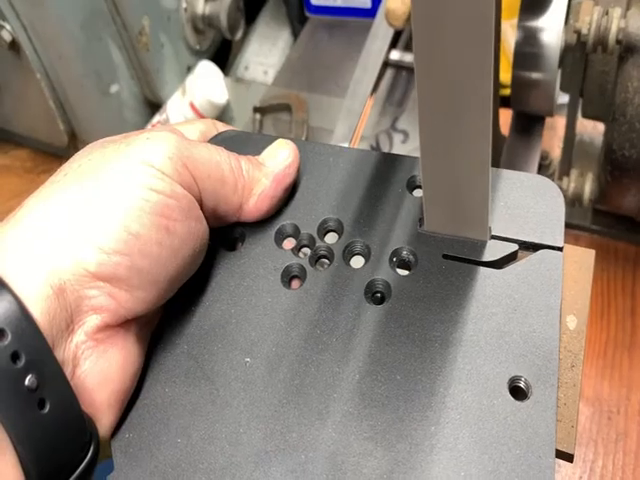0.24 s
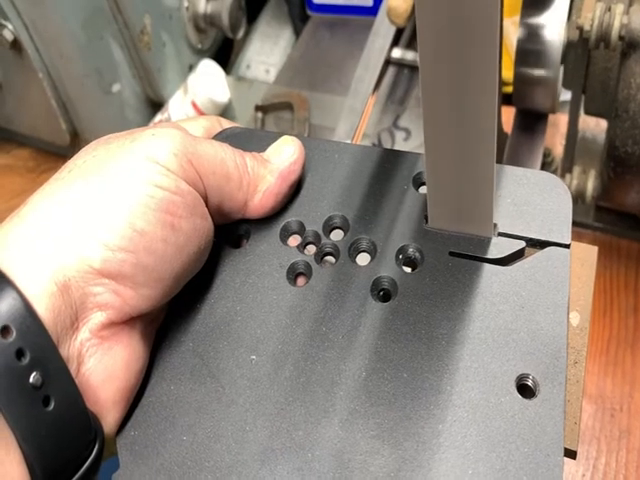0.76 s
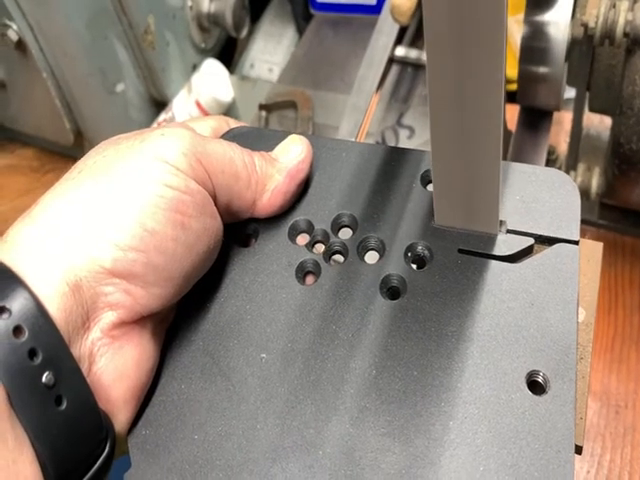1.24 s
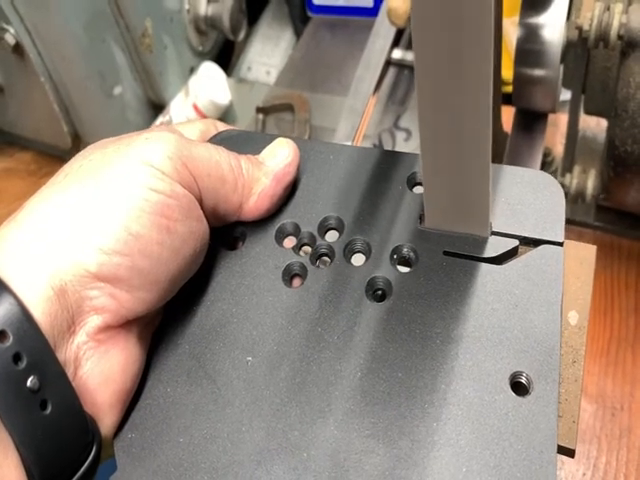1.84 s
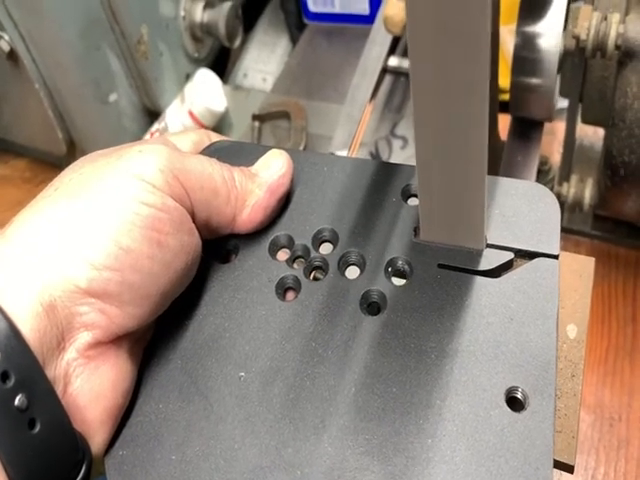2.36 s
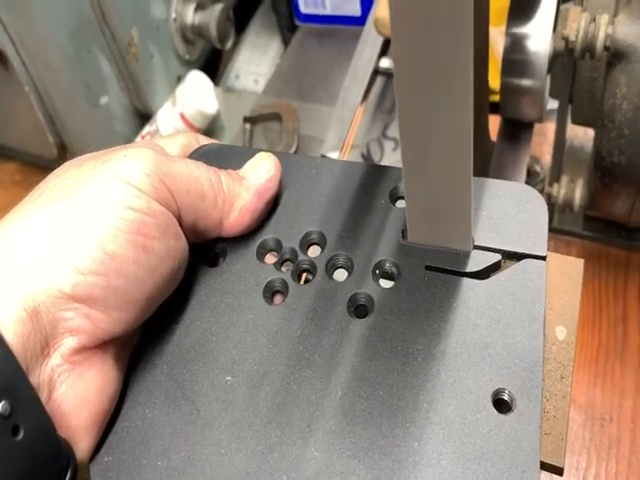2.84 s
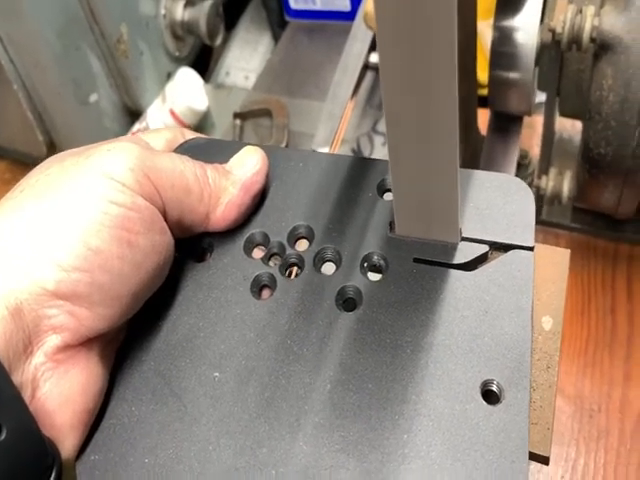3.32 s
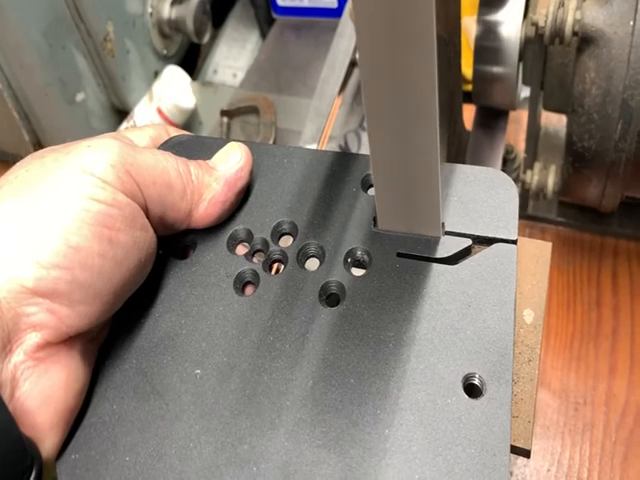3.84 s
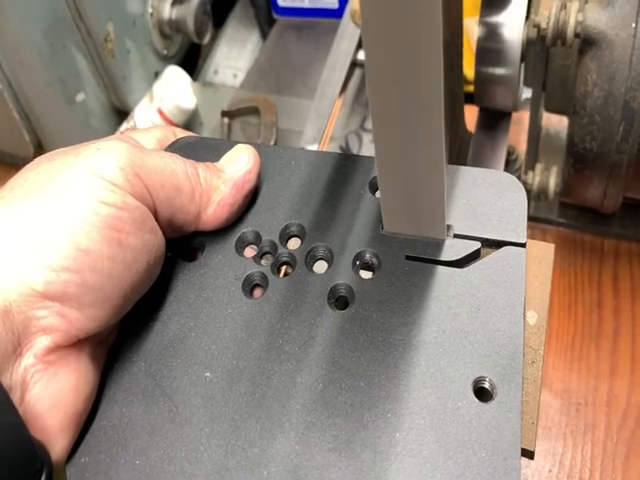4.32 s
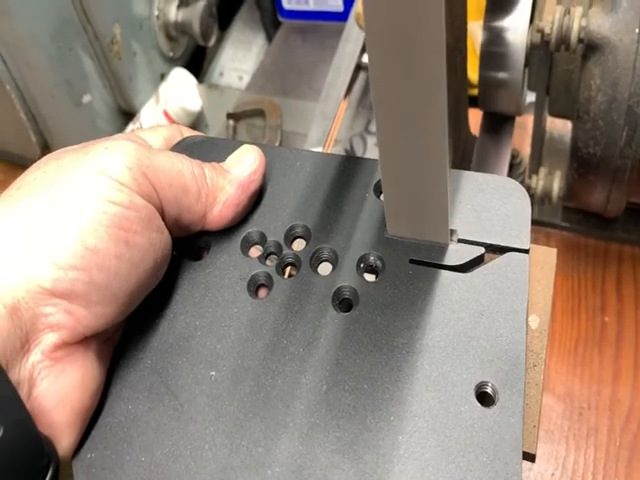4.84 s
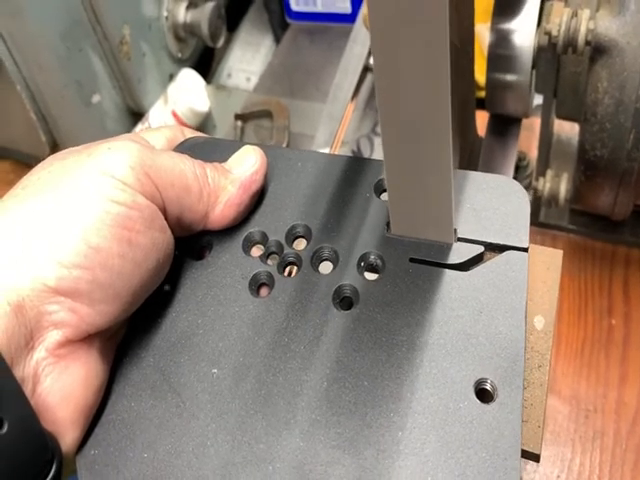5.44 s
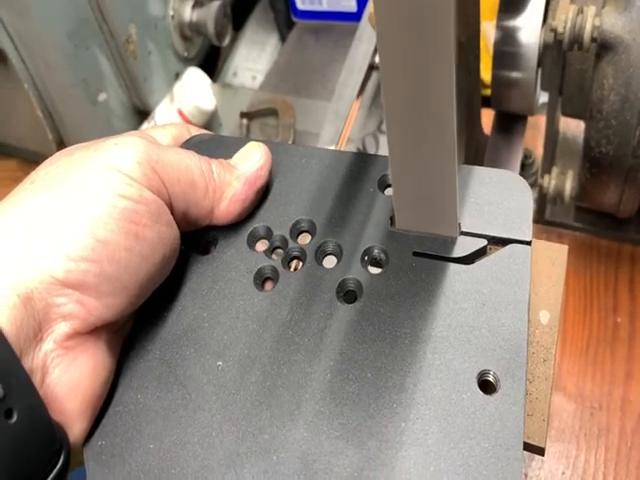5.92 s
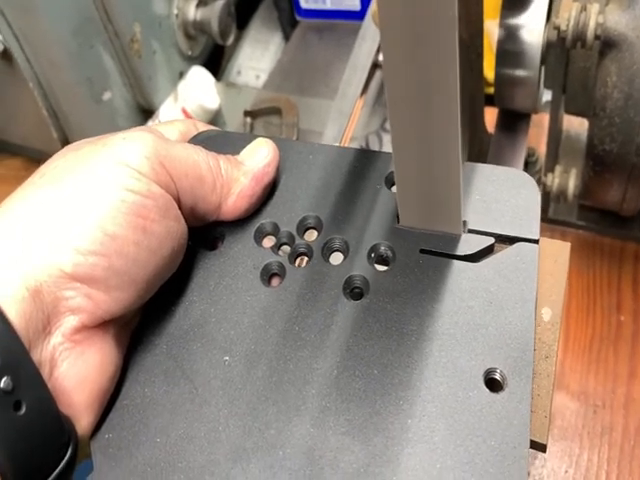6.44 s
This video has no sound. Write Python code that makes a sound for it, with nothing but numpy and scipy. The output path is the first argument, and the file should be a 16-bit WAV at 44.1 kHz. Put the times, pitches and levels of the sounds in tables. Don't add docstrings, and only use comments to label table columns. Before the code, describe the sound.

A small band saw idles in a workshop, its blade rasping and ticking through a metal plate's slot over a steady electric motor hum.

```python
import sys
import numpy as np
from scipy import signal
from scipy.fft import rfft, irfft, dct, next_fast_len
from scipy.io import wavfile
from scipy.ndimage import uniform_filter1d

SR = 44100
rng = np.random.default_rng(int(sys.argv[2]) if len(sys.argv) > 2 else 0)


def wrap_up_sound(samples):
    columns = np.atleast_2d(samples).T
    tamed = np.clip(columns, -1, 1)
    steps = np.round(tamed * 32767).astype(np.int16)
    wavfile.write(sys.argv[1], SR, steps)


def invert_db(level):
    return 10 ** (np.asarray(level, dtype=float) / 20)


N = 294147

MAINS_HZ, SHAFT_HZ, WHEEL_HZ = 120.0, 29.72, 6.553
T = np.arange(N) / SR
SIZE = next_fast_len(N + 8192)
HZ = np.fft.rfftfreq(SIZE, 1 / SR)


def evened(x):
    return x / np.sqrt(np.mean(x ** 2) + 1e-20)


def read(points, column=1):
    p = np.array(points)
    return np.interp(np.log(HZ + 1), np.log(p[:, 0] + 1), p[:, column])


def drift(rate_hz):
    noise = rfft(rng.standard_normal(SIZE))
    return evened(irfft(noise / (1 + (HZ / rate_hz) ** 2), SIZE)[:N])


def above(hz, width):
    return .5 + .5 * np.tanh((HZ - hz) / width)


def body(spectrum, modes, ref_db):
    rings = sum((invert_db(2 * db) - 1) / (1 + (2 * (HZ - hz) / width) ** 2) for hz, width, db in modes)
    gain = invert_db(read(spectrum) + ref_db) * np.sqrt(SR / 2 * np.maximum(1 + rings, .01))
    log_gain = np.log(gain)
    whole = signal.hilbert(np.r_[log_gain, log_gain[-2 + SIZE % 2:0:-1]])
    return np.exp(np.conj(whole[:len(HZ)]))


# time in seconds, pressure of its flank in dB, bite of its teeth in dB.
BEARING = [(0, .6, -.8), (.35, -.5, -.7), (.75, -1.2, 0), (1, -1.6, 1.2), (1.2, -3.4, -.7), (1.5, -1.2, 0),
           (1.85, 1.0, -.3), (2.4, 1.1, -.2), (3.1, 1.4, .2), (3.5, 1.6, -.6), (3.85, 1.5, .6),
           (4.15, -1.1, .2), (4.5, -.6, 1.4), (5, -1.2, .6), (5.35, .1, -.5), (5.7, 1.4, -.5),
           (6.15, .9, 0), (6.66, .4, 2.6)]


def swelling(spectra, follows, edges):
    s, pressure_db, bite_db = np.transpose(BEARING)
    steps = [1] + [above(hz, 260) for hz in edges] + [0]
    out = 0
    for k, (per_pressure, per_bite, creep) in enumerate(follows):
        level_db = per_pressure * pressure_db + per_bite * bite_db + creep * (s - s.mean())
        band = irfft(spectra * (steps[k] - steps[k + 1]), SIZE)[:, :N]
        out = out + invert_db(np.interp(T, s, level_db)) * band
    return out


# frequency in Hz, level in dB per Hz.
RASP_COLOUR = [(5000, -14.5), (5600, -9), (6400, -4.2), (6720, -6.9), (7350, -6.3), (7780, 1.8),
               (8150, -2.6), (8550, 2.6), (8900, -2.1), (11500, -1.6), (13000, -5.2), (13850, -1.2),
               (14000, -7.9), (15700, -2.5)]
# frequency in Hz, width in Hz, height over the noise in dB.
BLADE_RINGS = [(6390, 50, 5), (7070, 25, 11.5), (9520, 120, 2), (10105, 35, 6), (12210, 80, 2),
               (15700, 80, 2)]
# dB per dB of pressure, dB per dB of bite, creep in dB per second.
RASP_SWELL = [
    (1.25, 0, .15),
    (.63, .38, -.19),
    (0, 1.1, 0),
]


def blade(rub):
    near, scattered = rng.standard_normal((2, N)) * np.sqrt(rub)
    t = np.arange(200) / SR
    for s, db in catches():
        hz = rng.uniform(8400, 11200)
        tick = np.exp(-t / .00019) * np.cos(2 * np.pi * hz * t)
        near[round(s * SR):][:200] += invert_db(1.4 * db + 28) * tick
    same, lead_s = .985, 1 / 4680
    left = rfft(near, SIZE)
    turn = 2 * np.pi * HZ * lead_s + 0.11 + 0.17 * (1 - above(8700, 300))
    right = same * left * np.exp(1j * turn) + np.sqrt(1 - same ** 2) * rfft(scattered, SIZE)
    colour = body(RASP_COLOUR, BLADE_RINGS, ref_db=-65.5) * above(5692, 370)
    return swelling(colour * np.array([left, right]), RASP_SWELL, (7500, 11000))


# time
# in seconds, peak in dB.
STRAY_TICKS = [(0.2535, -12.8), (0.4275, -8), (0.7376, -12.8), (1.1782, -13.2), (1.2723, -12.9),
               (1.4448, -10.1), (1.576, -6), (1.5871, -10), (1.7197, -11.2), (1.9298, -10.4),
               (2.7537, -12.2), (3.3718, -11.6), (4.2903, -9.5), (4.6215, -11.6), (5.7554, -9),
               (5.9067, -10.8), (6.3295, -9.7), (6.4222, -11.2), (6.6307, -10.4),
               (0.0288, -15.5), (0.3456, -14.4), (0.3657, -13.5), (0.4869, -14.1), (0.9804, -12.4),
               (1.2377, -15.5), (1.3291, -14.3), (1.3904, -14.8), (1.4735, -13.7), (1.5461, -12.7),
               (1.7457, -12.8), (1.8462, -12.3), (2.1068, -13.0), (2.1226, -13.5), (2.5644, -11.9),
               (2.6037, -12.6), (2.7293, -13.1), (3.3866, -11.6), (3.4698, -13.6), (3.645, -12.8),
               (3.7032, -13.0), (3.764, -13.1), (3.8319, -11.3), (4.3446, -12.7), (4.4626, -12.5),
               (4.6803, -13.3), (5.0535, -11.7), (5.145, -14.1), (5.2201, -14.0), (5.2893, -14.8),
               (5.3538, -14.2), (5.8376, -13.5), (5.9642, -14.1), (6.0134, -13.8), (6.0199, -13.7),
               (6.0878, -14.0), (6.4273, -12.4), (6.4555, -12.8)]
# place as a share of a turn, first second, last second, peak in dB.
WHEEL_BURRS = [(.078, 1.6, 3.5, -15), (.078, 5.0, 6.6, -15), (.095, 1.8, 3.5, -14), (.115, 3.8, 5.3, -13),
               (.193, 1.8, 3.6, -13.5), (.248, 1.9, 3.5, -14), (.328, 1.2, 2.8, -15), (.4, 2.4, 4.2, -14),
               (.4, 5.2, 6.1, -14.5), (.445, 3.7, 6.6, -14.5), (.468, .8, 2.1, -13), (.468, 3.9, 5.2, -14),
               (.638, .1, 6.6, -16), (.665, .1, 6.0, -16), (.805, 1.9, 3.4, -12)]


def catches():
    turns = np.arange(int(N / SR * WHEEL_HZ))
    jolts = []
    for share, first, last, db in WHEEL_BURRS:
        for s in (turns + share) / WHEEL_HZ:
            if first < s < last:
                jolts.append((s, db + 1.3 * rng.standard_normal()))
    return STRAY_TICKS + jolts


WHEEL_WOBBLE = [(1, 0.043, 0.21), (2, 0.099, 0.41), (3, 0.14, 0.32), (4, 0.033, 0.9), (5, 0.044, 0.36),
                (6, 0.084, 0.74)]
# rate in Hz, depth as a share of power, first peak as a share of a cycle.
QUICK_THROBS = [(29.74, .12, .04), (85.19, .09, .46), (98.3, .09, .94), (120, .17, .56), (144.1, .06, .28),
                (170.33, .08, .37), (196.52, .07, .89), (203.05, .06, .11)]


def turning():
    slow = sum(d * np.cos(2 * np.pi * (order * WHEEL_HZ * T - at)) for order, d, at in WHEEL_WOBBLE)
    quick = sum(d * np.cos(2 * np.pi * (hz * T - at)) for hz, d, at in QUICK_THROBS)
    return np.maximum(1 + slow, .1) * np.maximum(1 + quick, .1)


def grit(per_s, spread_db, fade_s, share):
    sizes = invert_db(spread_db * np.minimum(rng.exponential(1, N), 4)) * (rng.random(N) < per_s / SR)
    bursts = signal.lfilter([1], [1, -np.exp(-1 / (fade_s * SR))], sizes)
    return 1 - share + share * bursts / bursts.mean()


# frequency in Hz, level in dB per Hz.
FRAME_COLOUR = [(40, -10), (60, -15.5), (100, -12), (200, -10), (320, -8.5), (480, -8), (700, -11),
                (1200, -13), (1800, -13.5), (2400, -9), (2700, -6.5), (3600, -7), (4000, -13.5),
                (5100, -13)]
# frequency in Hz, width in Hz, height
# over the noise in dB.
FRAME_RINGS = [(96, 12, 7), (390, 20, 5), (475, 150, -9), (570, 25, 7), (685, 60, -12), (600, 14, 9),
               (628, 15, 7), (830, 110, 6), (912, 20, 8), (1012, 12, 11), (1130, 90, -3), (1640, 40, 4),
               (2026, 25, 4), (2270, 40, 3), (2586, 18, 11), (3366, 14, 11), (3497, 25, 12),
               (2800, 120, 1.5), (3130, 150, 1.5), (4160, 120, 3), (4510, 70, 5.5), (4840, 45, 5),
               (5320, 120, 6), (5540, 220, 4)]
# dB per dB of pressure, dB per dB of bite, creep in dB per second.
FRAME_SWELL = [
    (.08, 0.57, 0.15),
    (0.511, 0.87, -0.25),
    (.42, .3, -.2),
]
# frequency in Hz, likeness in step,
# likeness a quarter cycle apart, left minus right in dB.
PORT_LIKENESS = [(40, .88, 0, -.3), (150, .98, -.1, -.8), (430, .84, -.4, -1.2), (650, .9, -.1, .3),
                 (860, .76, -.45, .8), (1030, .65, -.65, 1.2), (1200, -.2, -.4, 4.5), (1340, -.1, .45, 3),
                 (1620, .05, -.25, 0), (1860, 0, .65, -.2), (2100, .55, .2, -.6), (2250, .2, .2, -.9),
                 (2400, .55, -.05, -.9), (2780, -.65, -.1, -.7), (2980, -.9, 0, -.6),
                 (3340, 0.0, -.35, 1.0), (3520, -0.85, 0.1, 1.8), (3900, 0.8, -0.08, -0.4),
                 (4050, .65, 0, -.6), (4200, -0.45, -0.05, -0.9), (4480, 0.4, -0.15, -0.1),
                 (4700, -.1, -0.2, -0.3), (5050, .25, .1, .8), (5210, 0.85, 0, 1.5),
                 (5500, -0.62, 0.3, 2.0)]


def frame(rub):
    knock = 1 + 1.2 * (.5 + .5 * np.cos(2 * np.pi * (SHAFT_HZ * T - .3))) ** 4
    low = rng.standard_normal((2, N)) * np.sqrt(knock * grit(90, 6, .004, .25))
    high = rng.standard_normal((2, N)) * rub ** 0.26 * knock ** 0.22
    rumble = rng.standard_normal((2, N))
    shaking = rfft(rumble, SIZE) * (1 - above(566, 89))
    shaking = shaking + rfft(low, SIZE) * (above(603, 112) - above(2000, 340))
    a, b = shaking + rfft(high, SIZE) * above(1380, 360)
    same = read(PORT_LIKENESS, column=1) + 1j * read(PORT_LIKENESS, column=2)
    same = same / np.maximum(abs(same) / .985, 1)
    tilt = invert_db(read(PORT_LIKENESS, column=3) / 2)
    other = same * a + np.sqrt(1 - abs(same) ** 2) * b
    pair = np.array([a * tilt, other / tilt])
    colour = body(FRAME_COLOUR, FRAME_RINGS, ref_db=-68.0)
    colour = colour * (1 - above(9700, 120)) * above(41.6, 10)
    return swelling(colour * pair, FRAME_SWELL, (1500, 3700))


# time in seconds, peak in dB.
WELD_STRIKES = [(0, -43), (.9, -43), (1.03, -35), (1.2, -45), (1.6, -43), (2.3, -57), (2.75, -47),
                (3.4, -51), (3.65, -37), (3.95, -43.5), (4.4, -38), (4.7, -41), (4.85, -45), (5.6, -54),
                (6.2, -48), (6.55, -38)]


def thump(hz=305, length_s=0.042, spread_db=1.9):
    turns = np.arange(int(N / SR * WHEEL_HZ))
    times = (turns + .7) / WHEEL_HZ
    peak_db = np.interp(times, *np.transpose(WELD_STRIKES))
    hits = np.zeros(N)
    hits[(times * SR).astype(int)] = invert_db(peak_db + spread_db * rng.standard_normal(len(turns)))
    t = np.arange(-2000, 2001) / SR
    boom = np.cos(2 * np.pi * hz * t) * np.cos(np.pi * np.clip(t / length_s, -.5, .5)) ** 2
    return signal.oaconvolve(hits, boom, "same") * invert_db(np.array([[-.5], [.5]]))


# mains order, shaft order, wheel order, level in dB rms, left minus right in dB.
HUM_LINES = [(1, 0, 0, -46.7, 0), (2, 0, 0, -52.8, -1.8), (3, 0, 0, -44.8, -1.2), (5, 0, 0, -62, 0),
             (1, -2, 0, -71, 0), (1, 1, 0, -63, -1), (1, 2, 0, -65, -1), (2, -1, 0, -64, -1),
             (2, 1, 0, -56, -2.5), (3, -1, 0, -65, -1), (3, 1, 0, -59, -1), (3, 2, 0, -66, -1),
             (4, 1, 0, -70, 0), (4, 2, 0, -67, 0), (4, 3, 0, -64, 0), (5, 1, 0, -63, 0), (0, 21, 0, -62, 0),
             (0, 22, 0, -69, 0), (0, 23, 0, -71, 0), (0, 0, 48, -61.5, -1)]


def motor():
    out = np.zeros((2, N))
    for mains, shaft, wheel, db, pan_db in HUM_LINES:
        hz = mains * MAINS_HZ + shaft * SHAFT_HZ + wheel * WHEEL_HZ
        lead = 0.19 + 2 * np.pi * hz * 0.000069
        waver = 0.063 + 0.025 * max(-48 - db, 0)
        angle = 2 * np.pi * (hz * T + rng.random()) + waver * drift(2.5)
        size = np.sqrt(2) * invert_db(db) * (1 + waver * drift(2.5))
        pan = invert_db(np.array([[pan_db], [-pan_db]]) / 2)
        out += size * pan * np.sin(angle + np.array([[lead], [0]]))
    return out


def scene():
    rub = turning() * grit(300, 2.2, 0.00081, 0.21) * invert_db(drift(5.4))
    rub = rub / rub.mean()
    return blade(rub) + frame(rub) + thump() + motor()


GRID, HOP = 964, 1024


def shaper(lines, order, strength):
    lags = np.array([lines[:len(lines) - k] @ lines[k:] for k in range(order + 1)])
    lags[0] += 1e-9
    k = np.arange(order)
    taps = np.linalg.solve(lags[abs(k[:, None] - k)], lags[1:])
    return np.r_[1, -strength ** np.arange(1, order + 1) * taps]


# frequency in Hz, step in dB.
ROUNDING_STEPS = [(350, -25), (1030, -20.5), (1720, -12), (2500, -1), (3100, -1), (3550, 1.5), (3800, -2.7),
                  (4500, -1.4), (5200, -.6), (6000, .3), (8000, -1), (10000, -2), (12700, -3),
                  (15500, -2.7)]


def starved(x, fickle_db, rounding, shaped_shares):
    window = np.sin(np.pi * (np.arange(2 * HOP) + .5) / (2 * HOP))
    frames = N // HOP + 3
    pair = np.array([x[0] + x[1], x[0] - x[1]]) / 2
    pair = np.pad(pair, ((0, 0), (2 * HOP - GRID, 3 * HOP)), "reflect")
    at = np.arange(frames)[:, None] * HOP + np.arange(2 * HOP)
    a, b, c, d = np.split(pair[:, at] * window, 4, axis=2)
    lines = dct(np.concatenate([-c[..., ::-1] - d, a - b[..., ::-1]], axis=2), type=4) / 2
    wobble = rng.standard_normal((frames, 1))
    wobble = wobble + .6 * rng.standard_normal((frames, 64)).repeat(16, axis=1)
    notch_db = 1.5
    step_db = np.interp(np.arange(HOP) * SR / (2 * HOP), *np.transpose(ROUNDING_STEPS))
    step = invert_db(step_db + notch_db * np.round(fickle_db * wobble / notch_db))
    kept = ~dropped(lines, 1.2) & (np.arange(HOP) < 734)
    mood = uniform_filter1d(rng.standard_normal(frames), size=3)
    reach = slice(40, 733)
    shaped = []
    for c, share in enumerate(shaped_shares):
        for f in np.flatnonzero(mood < np.quantile(mood, share)):
            shaped.append((c, f, shaper(lines[c, f, reach], order=5, strength=.68)))
    for c, f, taps in shaped:
        lines[c, f, reach] = signal.lfilter(taps, [1], lines[c, f, reach])
    whole = np.floor((abs(lines) / step) ** .75 + rounding)
    lines = kept * np.sign(lines) * step * whole ** (4 / 3)
    for c, f, taps in shaped:
        lines[c, f, reach] = signal.lfilter([1], taps, lines[c, f, reach])
    a, b = np.split(dct(lines, type=4) / HOP, 2, axis=2)
    halves = np.concatenate([b, -b[..., ::-1], -a[..., ::-1], -a], axis=2) * window
    halves = halves.reshape(2, frames, 2, HOP)
    mid, side = (halves[:, 1:, 0] + halves[:, :-1, 1]).reshape(2, -1)[:, HOP - GRID:][:, :N]
    return np.array([mid + side, mid - side])


# frequency in Hz, margin in dB.
MASKING_MARGIN = [(2600, 30), (2760, 9.5), (2950, 7), (3250, 11), (3500, 9), (3800, 13), (5500, 14.5),
                  (6100, 12.5), (6420, 8.5), (6680, 11.5), (7050, 11.3), (7260, 6), (7480, 4.5), (7650, 9),
                  (8830, 11), (9000, 6), (9500, 6), (9680, 9.5), (11050, 6), (11280, 9), (11500, 10),
                  (11800, 11), (11950, 11), (12140, 8.5), (12300, 11), (13100, 9.5), (13450, 10.5),
                  (13700, 12.5), (14300, 6), (14550, 7), (15000, 8)]
# time in seconds, near 3 kHz in dB, near 6 kHz in dB, near 7 kHz in dB.
SPARE_MARGIN = [(0, -2, -1, -2.5), (.5, -1.5, -1, -3.5), (.7, 3, -3.5, -4), (1.2, 3, -4, -3.5),
                (1.4, 3, 0, -4.5), (1.65, 0, -3, -4), (1.9, -2, 1, -.5), (2.5, -3.5, 4, 0),
                (3.2, -4.5, 3.5, 1), (3.6, 3, 2, 3), (3.95, 3, -3.5, 3.5), (4.3, 2.5, -2.5, 3),
                (4.7, 2.5, 2.5, 2.5), (4.95, -2, 3.5, 1.5), (5.3, -2, 1, -1), (5.6, -5, 2, 2),
                (5.95, -2, 3.5, -1), (6.2, 0, -3, -3), (6.7, 0, -3, -3)]
# time in seconds, share of frames.
HUM_LOSSES = [(0, .2), (2, .15), (2.25, .65), (3.3, .55), (3.55, .15), (4, .45), (4.6, .15), (5.2, .65),
              (5.8, .5), (6.1, .2), (6.7, .25)]


def dropped(lines, fickle_db):
    power = (lines ** 2).reshape(2, -1, 128, 8).mean(3)
    power = uniform_filter1d(power, size=5, axis=1) + 1e-12
    power = uniform_filter1d(power, size=5, axis=2)
    hz = (np.arange(128) + .5) * SR / 256
    s = np.arange(power.shape[1]) * HOP / SR
    zones = [(hz > low) & (hz < high) for low, high in ((2700, 3200), (5400, 6700), (6700, 7600))]
    at, *spares = np.transpose(SPARE_MARGIN)
    margin_db = np.interp(hz, *np.transpose(MASKING_MARGIN))
    for db, zone in zip(spares, zones):
        margin_db = margin_db + np.interp(s, at, db)[:, None] * zone
    chance = rng.standard_normal((2, len(s), 64)).repeat(2, axis=2)
    chance = chance + 2.8 * (zones[1] | zones[2]) * rng.standard_normal((len(s), 1))
    margin_db = margin_db + fickle_db * chance
    lost = (power < power[::-1] * invert_db(-2 * margin_db)).repeat(8, axis=2)
    hum_share = np.interp(s, *np.transpose(HUM_LOSSES))
    lost[0, :, 20:24] = (rng.random(len(s)) < hum_share)[:, None]
    return lost


def roll_off(x):
    return signal.sosfilt(signal.butter(12, 16260, fs=SR, output="sos"), x)


def record(dry):
    start_s = 0.0161
    fade = np.clip((T - start_s) / 0.0012, 0, 1)
    coarse = starved(dry * fade, fickle_db=1.1, rounding=.365, shaped_shares=(.65, .45))
    return roll_off(coarse * (T > start_s - .0003))


dry = scene()
out = record(dry)
wrap_up_sound(out)
```